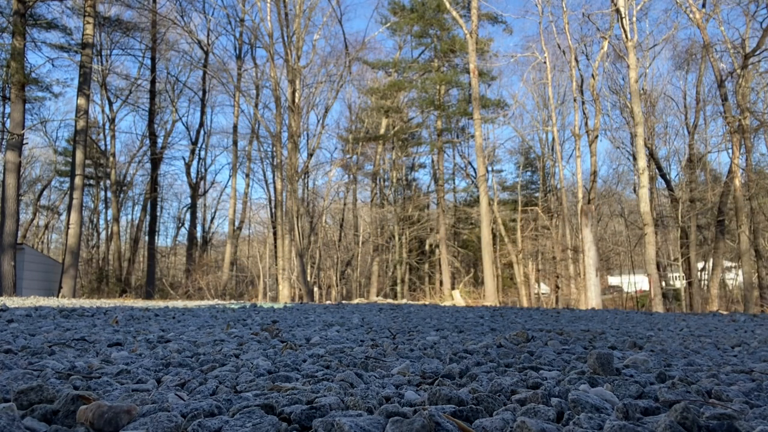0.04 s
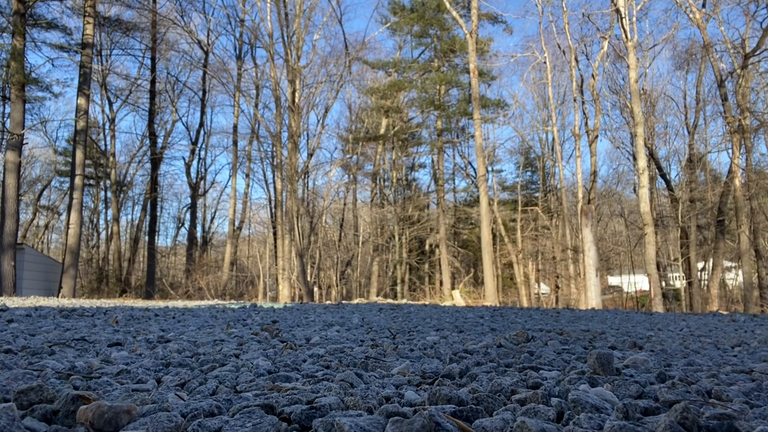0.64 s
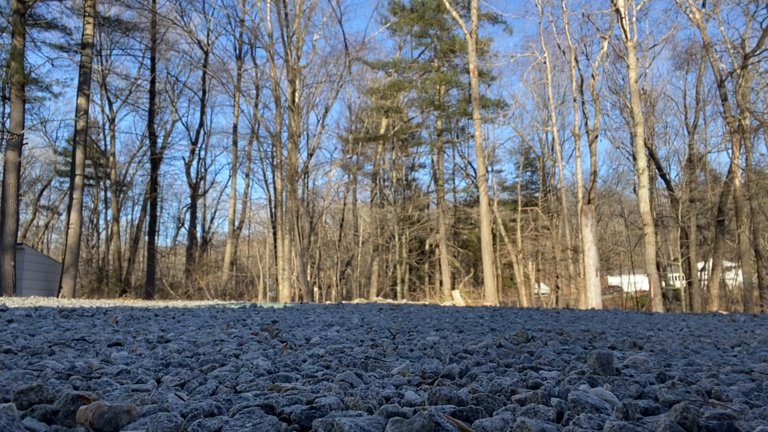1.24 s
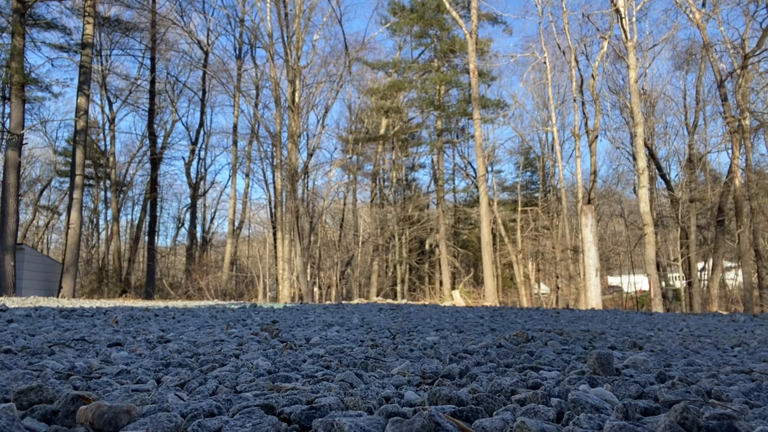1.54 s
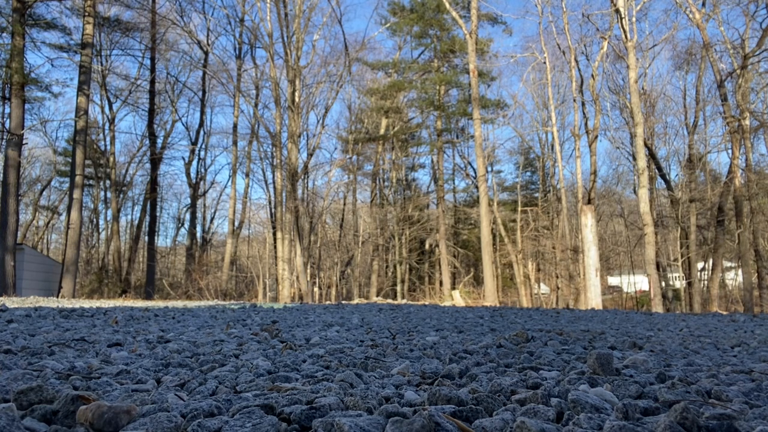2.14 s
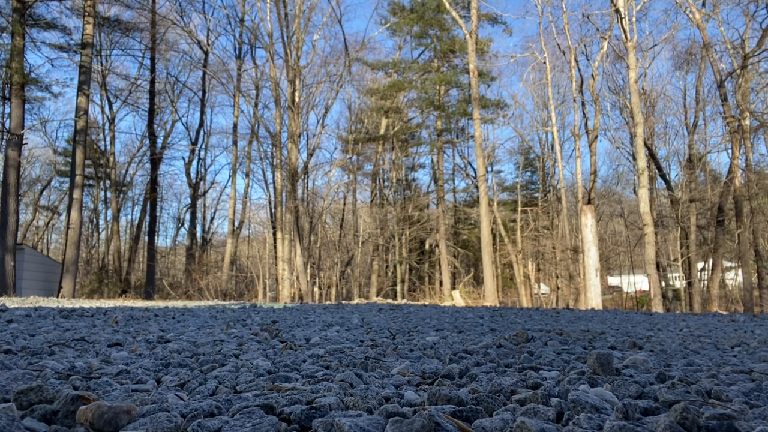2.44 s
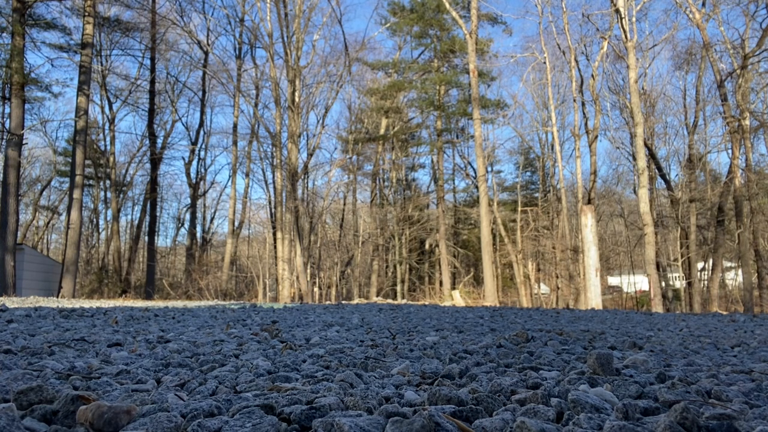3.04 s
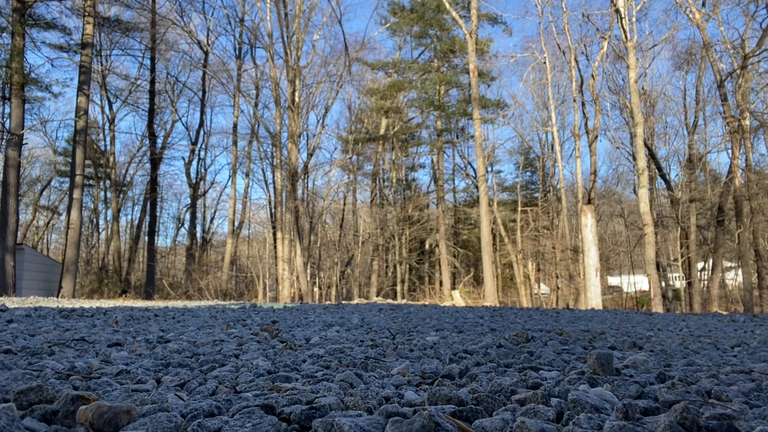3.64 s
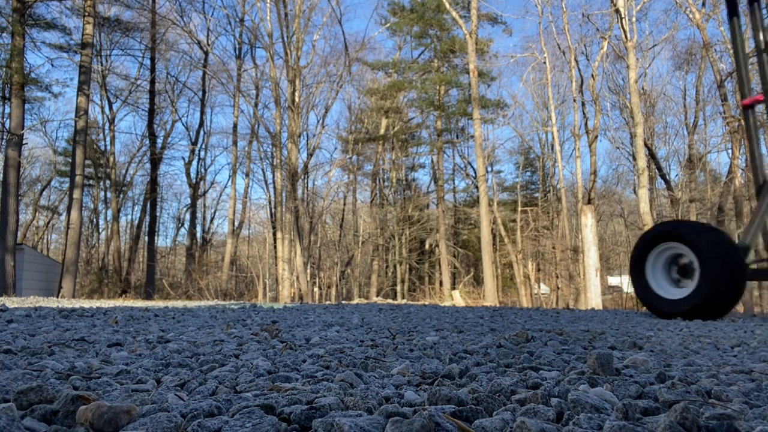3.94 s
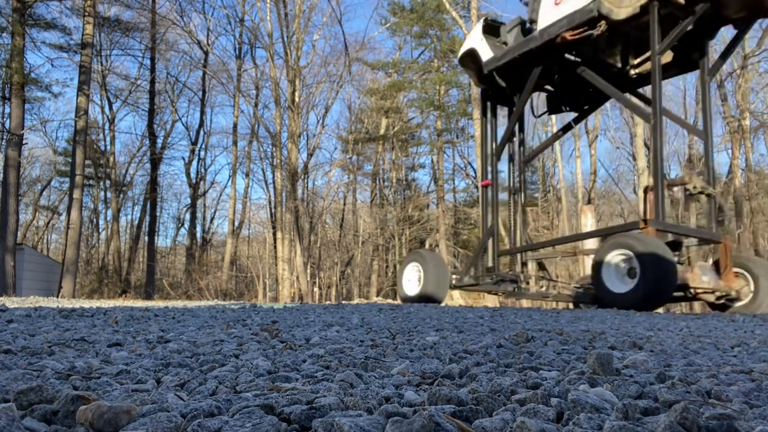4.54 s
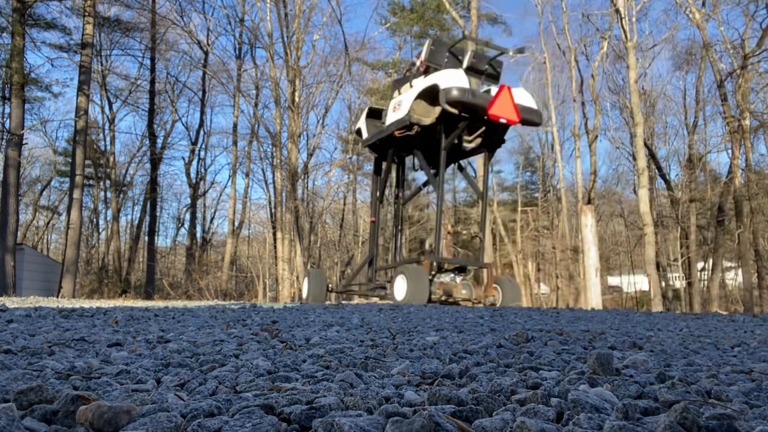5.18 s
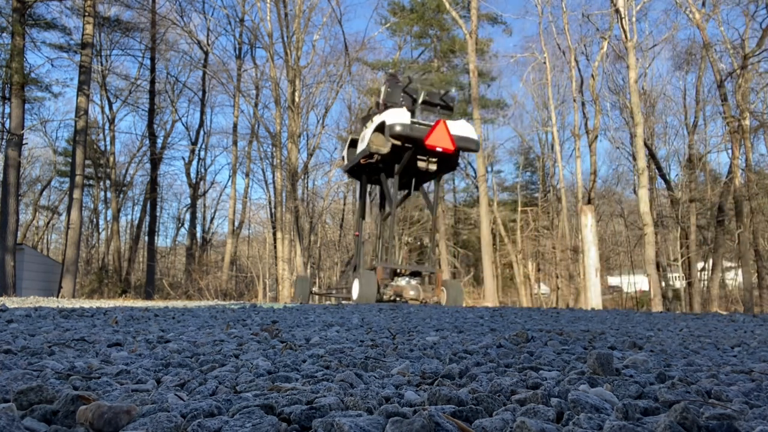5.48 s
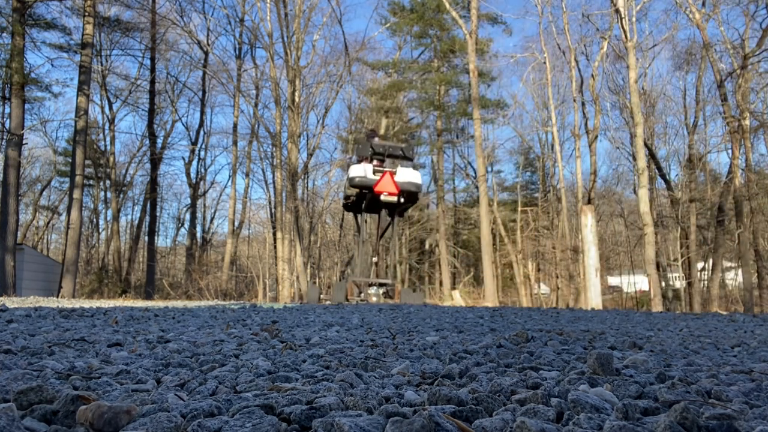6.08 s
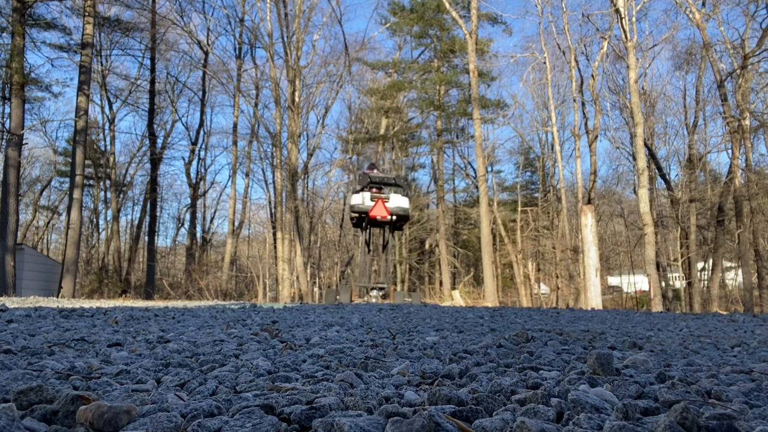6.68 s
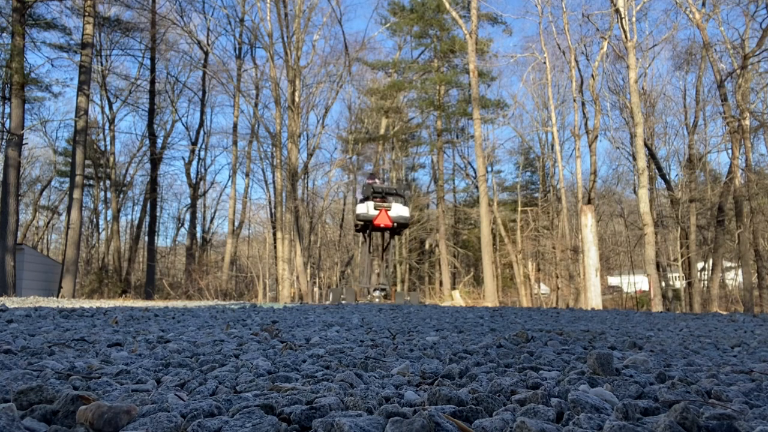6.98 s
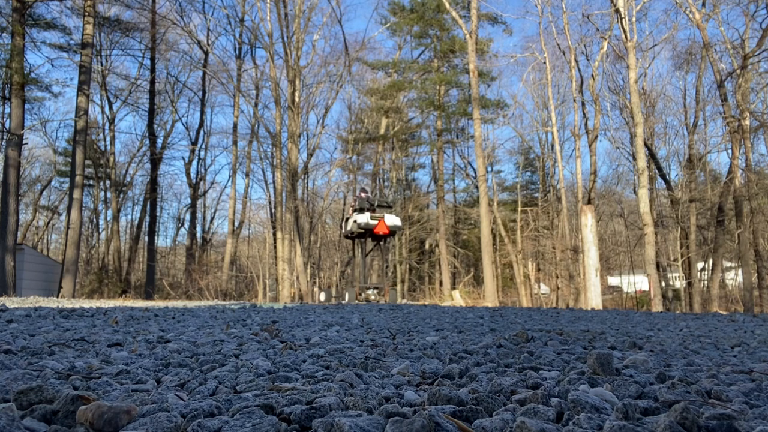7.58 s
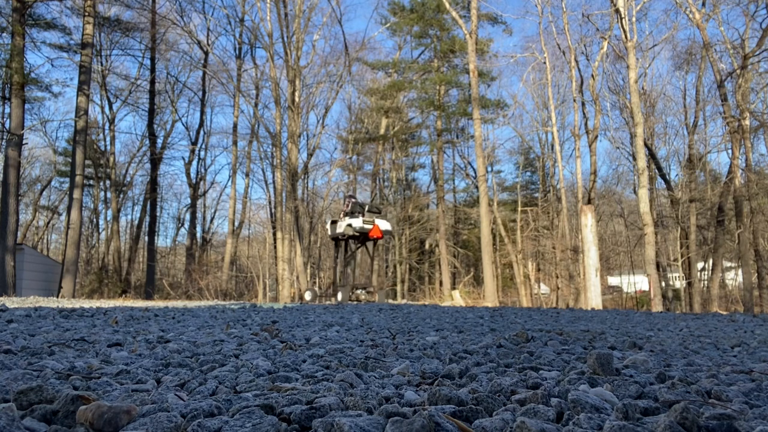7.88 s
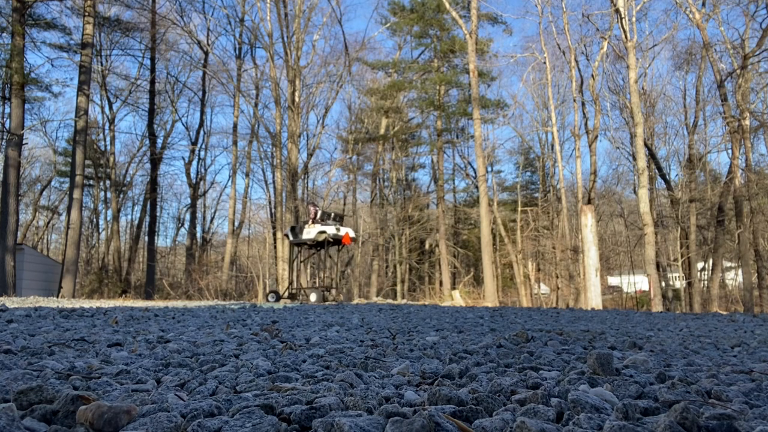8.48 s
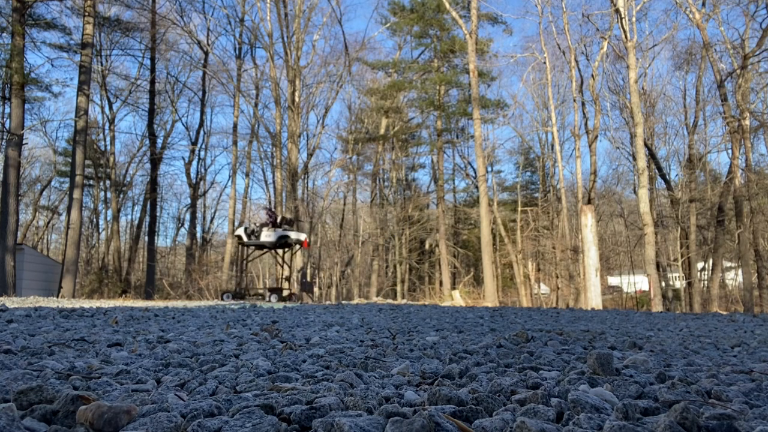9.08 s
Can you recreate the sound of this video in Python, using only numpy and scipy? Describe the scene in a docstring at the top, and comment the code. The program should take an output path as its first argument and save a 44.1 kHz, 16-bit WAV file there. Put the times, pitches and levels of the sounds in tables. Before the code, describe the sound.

A small one-cylinder engine surges, puffs and backfires as a cart drives past on crunching gravel and away.

```python
"""A golf cart passes on gravel

A golf cart on tall stilts drives past a microphone on a gravel driveway, from behind on the right
to far ahead. Its one-cylinder engine never settles: the governor (its speed control) kicks the
throttle open and the exhaust barks and bangs, then shuts it and the exhaust puffs dully.
The engine clatters and drones, the drive whines, the tyres crunch and the trees echo."""
import sys
import numpy as np
from scipy import signal
from scipy.fft import rfft, irfft
from scipy.io import wavfile

SR = 44100
rng = np.random.default_rng(int(sys.argv[2]) if len(sys.argv) > 2 else 0)


def wrap_up_sound(samples):
    """Save the sound to the file named by the first command line argument, as 16-bit audio."""
    columns = np.atleast_2d(samples).T
    # keep every value between -1 and 1, then stretch to whole-number steps
    tamed = np.clip(columns, -1, 1)
    steps = np.round(tamed * 32767).astype(np.int16)
    wavfile.write(sys.argv[1], SR, steps)


N = 411012
TIME = np.arange(N) / SR


# tone of the exhaust: (pitch [Hz], relative level [dB])
EXHAUST_TONE = [(45, -37), (80, -3), (105, -5.5), (150, 2.5), (200, -1.5), (280, 4), (340, -1), (440, 1),
                (620, -17.5), (1000, -18), (1270, -25), (1550, -39), (2100, -38), (2500, -48),
                (4400, -41.5), (5800, -51)]

def exhaust(clicks, rough=0.65, rough_above_hz=450):
    """Each firing sends out a rough pulse; the silencer delays its lows, so it sweeps downward."""
    swirl = signal.lfilter(*signal.butter(2, rough_above_hz, "high", fs=SR), gush(clicks, decay_s=0.0029))
    pulses = coloured(clicks + rough * swirl, EXHAUST_TONE)
    first_chamber = delayed_near(pulses, hz=418, q=0.31)
    return from_db(-7.0) * delayed_near(first_chamber, hz=153, q=0.52)


# the governor kicks the throttle open: (time [s], held open [s], relative exhaust level [dB])
THROTTLE_KICKS = [(0.165, .11, -16), (.594, 0.037, -15.5), (1.163, 0.04, -22), (1.562, 0.042, -11.5),
                  (1.881, 0.022, -11), (2.390, 0.059, -6), (2.778, .038, -14), (3.333, 0.075, -14),
                  (3.948, 0.071, -2), (4.367, 0.081, -1), (4.640, 0.12, -3), (5.003, 0.062, -3.5),
                  (5.256, 0.098, -3.5), (5.727, 0.056, -2.5), (6.128, 0.0079, -8), (6.318, 0.112, -2),
                  (6.533, 0.074, -11), (6.912, 0.009, 1), (7.057, 0.073, -10), (7.620, 0.03, -2),
                  (8.035, 0.095, -15), (8.236, .12, -5.5), (8.992, 0.052, -8)]
# speed the governor aims for: (time [s], firings [1/s])
ENGINE_SPEED = [(0, 27.7), (3.4, 28.7), (9, 26.2)]

def firings(surge_hz_per_s=19.62, sag_hz_per_s=3.5, drag_hz_per_s=4.025):
    """When the engine fires: it speeds up at a kick, then slows, faster with the throttle shut."""
    starts = [kick[0] for kick in THROTTLE_KICKS] + [N / SR]
    aim_hz, = in_time(ENGINE_SPEED, starts)
    fired = [starts[0] - np.arange(starts[0] * aim_hz[0], dtype=int)[:0:-1] / aim_hz[0]]  # lead-in
    for (start, held_s, _), end, mean_hz in zip(THROTTLE_KICKS, starts[1:], aim_hz):
        count = max(round((end - start) * mean_hz), 1)
        at = np.linspace(start, end, count, endpoint=False)
        age = at - start
        shut_s = sum(np.clip(at - a, 0, b - a) for a, b, _ in THROTTLE_SHUT)
        gain_hz = surge_hz_per_s * np.minimum(age, held_s) - sag_hz_per_s * age - drag_hz_per_s * shut_s
        periods = 1 / (mean_hz + gain_hz - gain_hz.mean())
        fired.append(start + (end - start) * (np.cumsum(periods) - periods) / periods.sum())
    return np.concatenate(fired)


def throttle(fired, opening_s=0.0054, closing_s=0.059):
    """At each firing: how far each kick opens the throttle (0-1), and whether it is shut."""
    opening = np.array([swell(fired, s, s + held, opening_s, closing_s) for s, held, _ in THROTTLE_KICKS])
    shut = np.any([(fired > start) & (fired < end) for start, end, _ in THROTTLE_SHUT], axis=0)
    shut &= opening.max(axis=0) < 1
    return opening * ~shut, shut


# relative levels as the cart passes: (time [s], clatter [dB], hum [dB], cruising exhaust [dB])
PASS_LEVELS = [(0, -27, -31.5, -23), (1.1, -26, -33.5, -29), (1.8, -11, -22, -19.5),
               (2.25, -11.5, -18, -27), (2.7, -10.5, -23, -17.5), (3.35, -11, -22.5, -3),
               (4.1, -13.5, -31, -8), (5.5, -22.5, -33, -6), (6.7, -27.5, -38, -18.5),
               (9.3, -26, -34, -15.5)]

def firing_levels(fired, opening, shut, shut_db=-16.5, spread_db=1.5):
    """An open throttle pulls each firing from cruising level to its kick's; a shut one softens it."""
    cruise_db = in_time(PASS_LEVELS, fired)[-1]
    kick_db = np.array(THROTTLE_KICKS)[opening.argmax(axis=0), -1]
    level_db = cruise_db + opening.max(axis=0) * (kick_db - cruise_db) + shut_db * shut
    return level_db + spread_db * rng.standard_normal(len(fired))


# bangs in the pipe: (time [s], relative level [dB])
BACKFIRES = [(0.166, -26), (0.2046, -31.5), (0.238, -31.5), (0.2752, -31.5), (0.595, -34.5), (0.6315, -37),
             (1.165, -31.5), (1.562, -27.5), (1.879, -21), (2.39, -24), (2.4244, -25), (3.912, -20),
             (3.949, -12), (3.9824, -15), (4.016, -14), (4.366, -12), (4.402, -11.5), (4.4367, -10.5),
             (4.6395, -17), (4.677, -9.5), (4.7154, -9), (4.751, -11), (4.786, -16), (4.963, -20.5),
             (5.001, -20), (5.0406, -10.5), (5.0745, -12), (5.2544, -20), (5.2916, -17), (5.3288, -18.5),
             (5.366, -24), (5.7255, -21), (5.762, -19.5), (5.796, -24.5), (6.127, -34), (6.912, -30.5),
             (8.1953, -30), (8.2355, -18.5), (8.2738, -19.5), (8.309, -27.5), (8.3447, -30),
             (8.7095, -37.5), (8.952, -30.5), (8.991, -27), (9.031, -26), (9.068, -32)]
# tone of a bang: (pitch [Hz], relative level [dB])
BANG_TONE = [(400, 19.5), (1500, 11), (3800, 9), (5800, 7), (8000, 11.5), (13000, 9.5), (15000, -3)]

def bangs(clicks, sharp=0.25, rush=0.45, spit_db=-39):
    """Unburnt fuel goes off with a snap and a rush of gas; every firing adds a faint spit."""
    times, db = np.transpose(BACKFIRES)
    snaps = blows(times, db - 6) + from_db(spit_db) * clicks
    burst = sharp * snaps + gush(snaps, decay_s=0.0021) + rush * gush(snaps, decay_s=0.0062)
    return coloured(burst, BANG_TONE)


# the throttle is shut: (start [s], end [s], relative puff level [dB])
THROTTLE_SHUT = [(0.11, 0.15, -21), (0.285, 0.377, -24), (0.558, 0.58, -17.5), (0.919, 1.058, -31),
                 (1.5, 1.55, -24), (1.736, 1.823, -24), (1.969, 2.36, -31), (2.713, 2.77, -17),
                 (3.76, 3.886, -23), (4.177, 4.343, -20), (4.496, 4.625, -20), (4.811, 4.95, -20.5),
                 (5.944, 6.19, -26.5), (6.44, 6.523, -28), (7.229, 7.389, -30), (8.493, 8.726, -30.5)]
# tone of a puff: (pitch [Hz], relative level [dB])
PUFF_TONE = [(45, -20.5), (65, 3.5), (90, 7), (125, 2.5), (180, -7), (400, -53.5)]

def puffs(fired, late_s=0.00716):
    """With the throttle shut, each cycle pumps out a soft, low puff."""
    clicks = sum(blows(fired[(fired > a) & (fired < b)] + late_s, db) for a, b, db in THROTTLE_SHUT)
    return from_db(2.0) * coloured(clicks, PUFF_TONE)


# tone of the clatter from the front and from the rear: (pitch [Hz], relative level [dB])
FRONT_TONE = [(60, -49.5), (110, -10), (210, -5), (290, -2.5), (400, 0), (600, -5), (950, -9.5),
              (1400, -19), (2500, -33)]
REAR_TONE = [(60, -5), (140, -6), (420, 2.5), (600, -12), (980, -12), (1500, -29.5), (5000, -63.5)]

def clatter(cycle, level_db, behind, loose=1.2, scattered=.5, throb=.2):
    """Valves, piston and belt loosely repeat one rattle every cycle; it is duller from the rear."""
    patterns = rng.standard_normal((3, 1600))
    repeating = np.array([np.interp(cycle % 1, np.linspace(0, 1, len(p)), p) for p in patterns])
    paths = repeating + loose * rng.standard_normal(repeating.shape)
    paths *= 1 + throb * np.cos(2 * np.pi * cycle)
    rattle = rms_one(paths[0] + scattered * paths[1:])  # one direct path, one scattered to each ear
    front = from_db(-7.5) * coloured(rattle, FRONT_TONE)
    rear = from_db(-4.5) * coloured(rattle, REAR_TONE)
    return from_db(level_db) * ((1 - behind) * front + behind * rear)


# drone of the crankshaft: (time [s], relative level [dB])
CRANK_LEVELS = [(0.0, -35), (0.2, -32), (0.89, -38.5), (1.8, -21.5), (2.4, -20.5), (4.5, -26), (7.76, -46),
                (8.1, -50), (8.25, -36), (9.2, -37)]
# notes of the silencer's hum: (multiple of the firing rate, relative level [dB])
HUM_NOTES = [(3, -7), (4, -5.5), (5, 0), (6, -8)]

def drone(cycle, effort, hum_db, effort_db=4.5, waver_db=1.3):
    """The crankshaft turns twice a cycle and the silencer hums above it; each note's level wavers."""
    turn = 2 * np.pi * cycle
    crank_db = in_time(CRANK_LEVELS)[0] + effort_db * effort + waver_db * drift(25)
    crank = from_db(crank_db) * np.sin(2 * turn)
    hum = sum(from_db(hum_db - 1.5 + db + 3.8 * drift(12)) * np.sin(round(multiple) * turn)
              for multiple, db in HUM_NOTES)
    return np.sqrt(2) * (crank + hum)


# whines: (start [s], end [s], first pitch [Hz], middle pitch [Hz], last pitch [Hz], relative level [dB])
WHINE_NOTES = [(1.35, 1.58, 216, 222.5, 206, -26), (2.054, 2.365, 211.7, 212.8, 220, -19),
               (2.723, 2.91, 404, 422.5, 423, -26), (2.498, 3.63, 388, 377.4, 394.5, -16.5),
               (5.073, 5.17, 402, 411, 394, -14.5), (9.077, 9.311, 303.3, 317, 290, -20.5)]

def whine(waver=0.0199, flutter_db=2.5, rise_s=0.015, fade_s=0.052):
    """Now and then the drive sings a wavering note that bends with the belt's speed."""
    notes, wobble = 0, 1 + waver * drift(40)
    for start, end, *hz, db in WHINE_NOTES:
        pitch_hz = np.interp(TIME, np.linspace(start, end, len(hz)), hz) * wobble
        turn = 2 * np.pi * np.cumsum(pitch_hz) / SR
        notes += from_db(db) * swell(TIME, start, end, rise_s, fade_s) * np.sin(turn)
    return np.sqrt(2) * from_db(flutter_db * drift(40) - 5.0) * notes


# tone of the air intake: (pitch [Hz], relative level [dB])
INTAKE_TONE = [(300, -3.5), (680, -0.5), (1400, -23)]

def intake(clicks):
    """The engine takes a hoarse gulp of air for each firing."""
    return from_db(-9.5) * coloured(gush(clicks, decay_s=0.0033), INTAKE_TONE)


# ringing notes of the valve cover: (pitch [Hz])
COVER_NOTES = [4320, 4800, 7670]

def valves(fired, late_s=0.012):
    """The valves tick once a cycle and set their cover ringing."""
    clatter_db = in_time(PASS_LEVELS, fired)[0]
    ticks = gush(blows(fired + late_s, clatter_db - 20.5), decay_s=0.0051)
    return sum(resonance(ticks, hz, q=23) for hz in COVER_NOTES)


# crunch under the tyres: (time [s], relative level [dB])
CRUNCH_LEVELS = [(0.0, -55), (1.0, -54), (1.25, -44.5), (1.82, -38.5), (2.7, -34), (3.35, -25.5),
                 (3.79, -32), (4.91, -33.5), (6.05, -45.5), (9.32, -52)]
# tone of the gravel: (pitch [Hz], relative level [dB])
GRAVEL_TONE = [(300, 8.5), (1700, 4), (2450, -1), (4000, 0.5), (4900, 1.5), (6000, -0.5), (8000, 4),
               (13000, 2), (15000, -10.5)]

def tyres(stones_per_s=3000, size_db=3.5, hiss=0.5, scatter=0.7):
    """Stones snap together under the tyres, so many that most blur into a hiss."""
    sizes = from_db(size_db * np.minimum(rng.exponential(1, N), 6)) * rng.choice([-1, 1], N)
    stones = rms_one(sizes * (rng.random(N) < stones_per_s / SR))
    crunch = rms_one(stones + hiss * rng.standard_normal(N) + scatter * rng.standard_normal((2, N)))
    return from_db(in_time(CRUNCH_LEVELS)[0] + drift(30)) * coloured(crunch, GRAVEL_TONE)


# tone of the thin hiss: (pitch [Hz], relative level [dB])
SIZZLE_TONE = [(10500, -7), (12750, -6), (15000, -22)]

def sizzle(level_db=-52):
    """A thin, very high hiss from the cart comes and goes once, straight ahead."""
    loudness = from_db(level_db) * swell(TIME, 6.32, 7.07, rise_s=0.027, fade_s=0.21)
    return loudness * coloured(rng.standard_normal(N), SIZZLE_TONE)


def trees(x, near_db=-11, near_s=0.073, far_db=-13, tail_s=0.88, dull_hz=2500):
    """Quick echoes from the cart's frame and the ground, then a dull tail from the trees."""
    age = np.arange(SR) / SR
    near = np.exp(-age / near_s) * (age > .004)
    far = from_db(-60 * age / tail_s) * (age > .03)
    shape = from_db(near_db) * near / np.linalg.norm(near) + from_db(far_db) * far / np.linalg.norm(far)
    mid, side = rng.standard_normal((2, SR)) * shape
    side = signal.lfilter(*signal.butter(1, 450, "high", fs=SR), side)  # same bass in both ears
    response = signal.lfilter(*signal.butter(1, dull_hz, fs=SR), [mid + side, mid - side])
    return signal.oaconvolve(x, response, axes=1)[:, :N]


# the cart's direction: (time [s], base delay of the left ear [ms], left minus right near 445 Hz [dB])
DIRECTION = [(0, 0.4, -14.5), (1.4, 0.22, -6.5), (2.75, 0.37, -13), (3.55, 0.52, -3), (4.3, 0.35, -3.5),
             (5.2, 0.109, -2), (5.8, 0.053, -1.5), (9.3, -0.02, 2)]

def placed(x, stretch=1):
    """The far ear hears the cart later and weaker; stretch scales that delay."""
    lag_ms, pan_db = in_time(DIRECTION)
    shift_s = stretch * lag_ms / 2000
    pair = np.array([np.interp(TIME - sign * shift_s, TIME, ear) for sign, ear in zip((1, -1), x)])
    ear_gains = from_db(np.outer([.5, -.5], pan_db))
    return pair + (ear_gains - 1) * resonance(pair, hz=445, q=0.66)


def blows(times, db, puff_s=0.011):
    """Clicks, each with the energy of one short puff of gas at the given level."""
    clicks = np.zeros(N)
    clicks[np.clip(times * SR, 0, N - 1).astype(int)] = from_db(db) * np.sqrt(puff_s * SR)
    return clicks


def gush(clicks, decay_s):
    """Each click becomes a rush of noise of equal energy that swells and dies."""
    age = np.arange(SR // 10) / SR
    shape = (age * np.exp(-age / decay_s)) ** 2
    power = signal.oaconvolve(clicks ** 2, shape / shape.sum())[:N]
    return np.sqrt(np.abs(power)) * rng.standard_normal(N)


def coloured(x, tone, size=8192):
    """Give a sound the tone in a table, fading 12 dB an octave beyond its ends."""
    hz, db = np.transpose(tone)
    octave = np.log2(np.maximum(np.fft.rfftfreq(size, 1 / SR), 1))
    outside_db = 12 * np.abs(octave - np.clip(octave, *np.log2(hz[[0, -1]])))
    cepstrum = irfft(np.log(from_db(np.interp(octave, np.log2(hz), db) - outside_db)))
    cepstrum[1:size // 2] *= 2  # fold, so the filter rings only after a click
    cepstrum[size // 2 + 1:] = 0
    response = irfft(np.exp(rfft(cepstrum)))
    return signal.oaconvolve(np.atleast_2d(x), [response / np.linalg.norm(response)], axes=1)[:, :N]


def resonance(x, hz, q):
    """Keep the pitches near hz; a higher q keeps fewer."""
    return signal.lfilter(*signal.iirpeak(hz, q, fs=SR), x)


def delayed_near(x, hz, q):
    """All pitches pass, but those near hz come out late."""
    return x - 2 * resonance(x, hz, q)


def swell(at, start, end, rise_s, fade_s):
    """Rise, hold at 1 from start to end, then fade."""
    return np.exp(np.minimum(at - start, 0) / rise_s - np.maximum(at - end, 0) / fade_s)


def drift(rate):
    """A random wander that turns rate times a second."""
    return np.interp(TIME * rate % 399, np.arange(400), rng.standard_normal(400))


def in_time(rows, at=TIME):
    """Read a table's columns at the given times."""
    times, *columns = np.transpose(rows)
    return [np.interp(at, times, column) for column in columns]


def from_db(db):
    """Turn decibels into a multiplier."""
    return 10 ** (np.asarray(db) / 20)


def rms_one(x):
    """Scale to an average power of 1."""
    return x / np.sqrt(np.mean(x ** 2) + 1e-20)


def scene():
    """The throttle drives the engine; the intake faces us first, the pipe once the cart has passed."""
    fired = firings()
    cycle = np.cumsum(np.interp(TIME, (fired[1:] + fired[:-1]) / 2, 1 / np.diff(fired))) / SR
    opening, shut = throttle(fired)
    effort = np.interp(TIME, fired, opening.max(axis=0) - shut)  # -1 shut, +1 wide open
    behind = np.interp(TIME, [3.5, 4.2], [0, 1])  # 1 once we hear the cart's rear
    clatter_db, hum_db, _ = in_time(PASS_LEVELS)
    clicks = blows(fired, firing_levels(fired, opening, shut))
    pipe, puffing, banging = exhaust(clicks), puffs(fired), bangs(clicks)
    gas = from_db(-6 + 4 * behind) * pipe + puffing + (1 - behind) * intake(clicks)
    echo_db = np.interp(TIME, [2.5, 4.2], [4, -2.5])  # more echo while the pipe points away
    echo = trees(from_db(echo_db) * (pipe + puffing + banging))
    rattle = clatter(cycle, clatter_db + 1.5 * effort, behind) + valves(fired)
    engine = gas + echo + rattle + drone(cycle, effort, hum_db) + whine()
    engine = placed(engine, stretch=1.18)  # low sound bends round the microphone, so it lags more
    front_axle, rear_axle = tyres() / np.sqrt(2), tyres() / np.sqrt(2)
    return engine + placed(banging + rear_axle) + placed(front_axle, stretch=0.86) + sizzle()


def record(dry, notch_hz=10430, top_hz=15800):
    """The microphone loses deep bass and a slice of treble; peaks are clipped and the top is cut."""
    thin = signal.sosfilt(signal.butter(3, 33, "high", fs=SR, output="sos"), dry)
    for _ in range(2):
        thin = thin - resonance(thin, notch_hz, q=5.25)
    return signal.sosfilt(signal.ellip(10, .2, 80, top_hz, fs=SR, output="sos"), np.clip(thin, -.92, .92))


dry = scene()
out = record(dry)
wrap_up_sound(out)
```